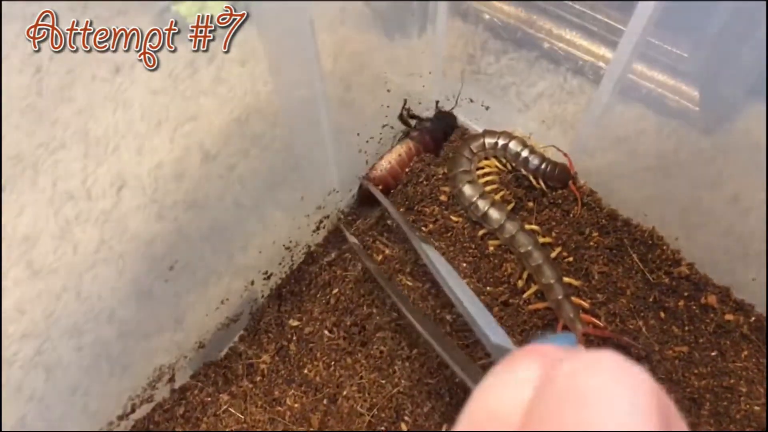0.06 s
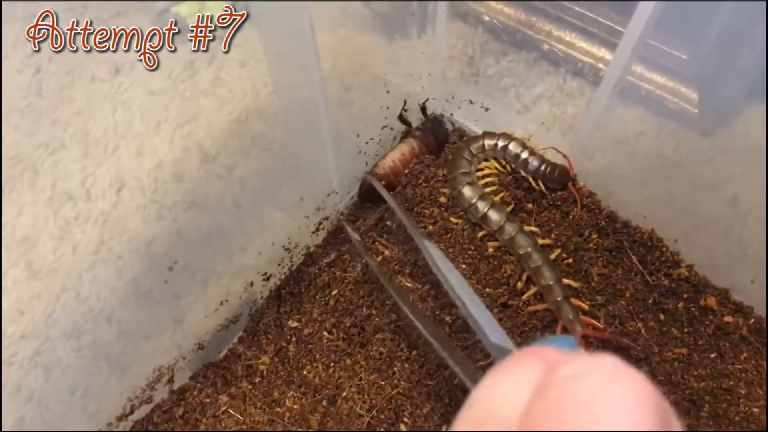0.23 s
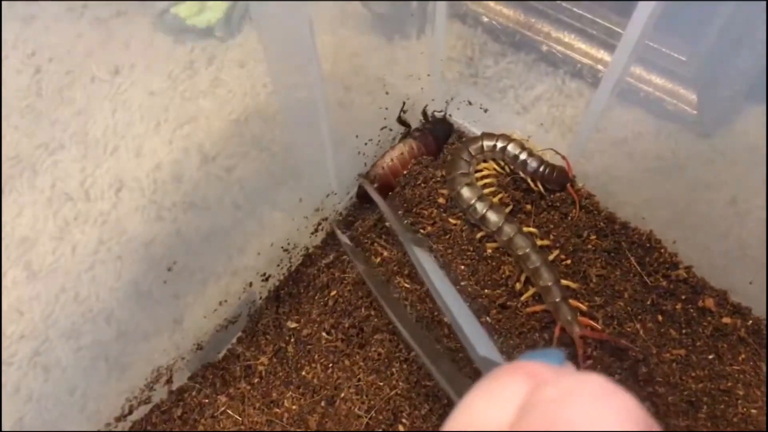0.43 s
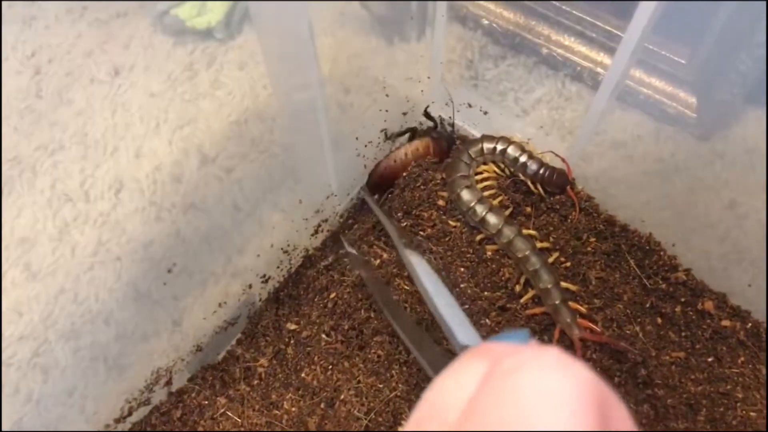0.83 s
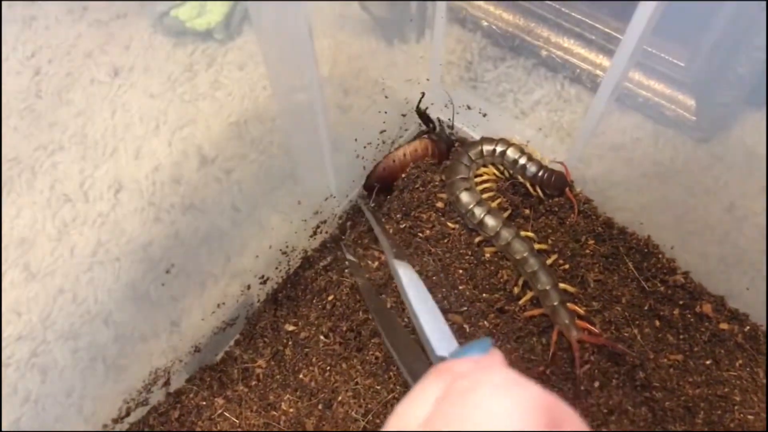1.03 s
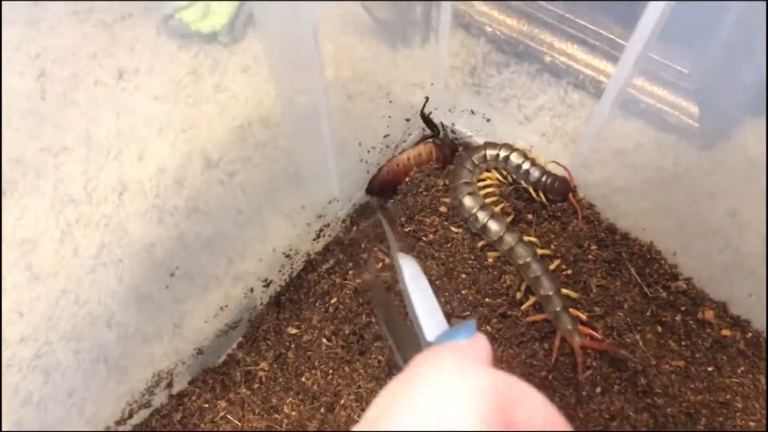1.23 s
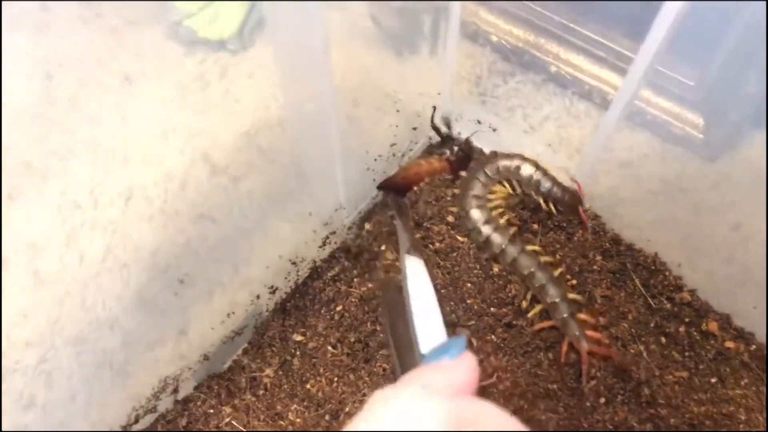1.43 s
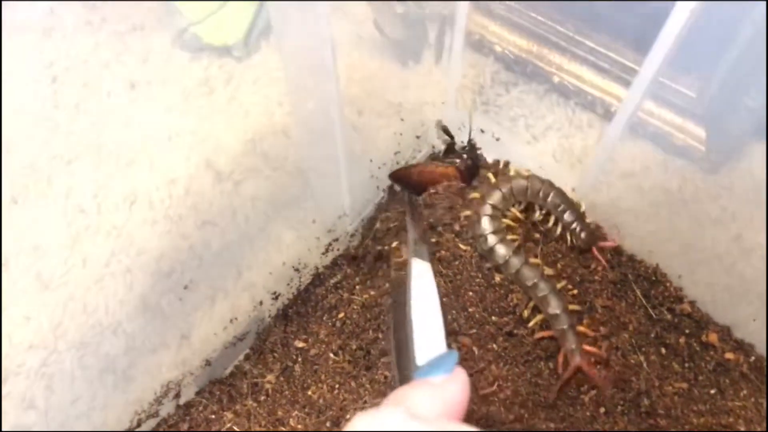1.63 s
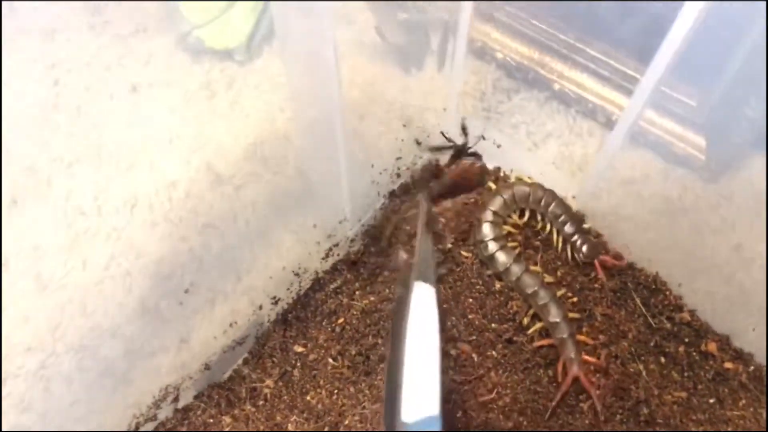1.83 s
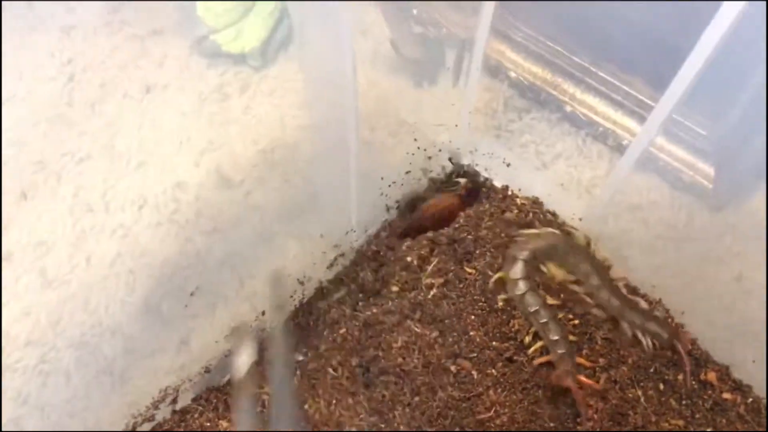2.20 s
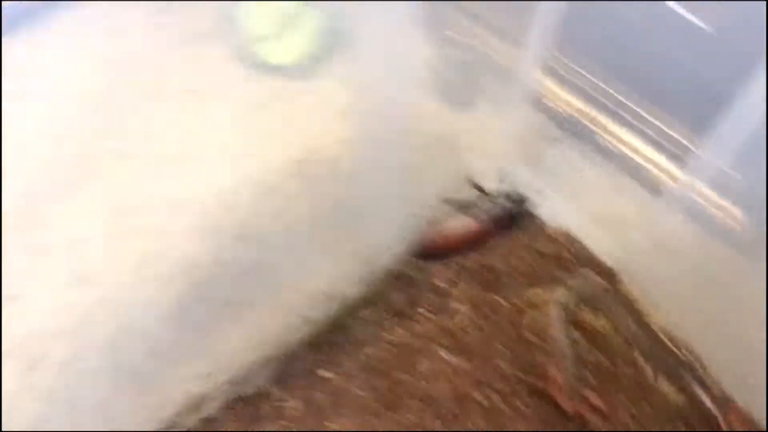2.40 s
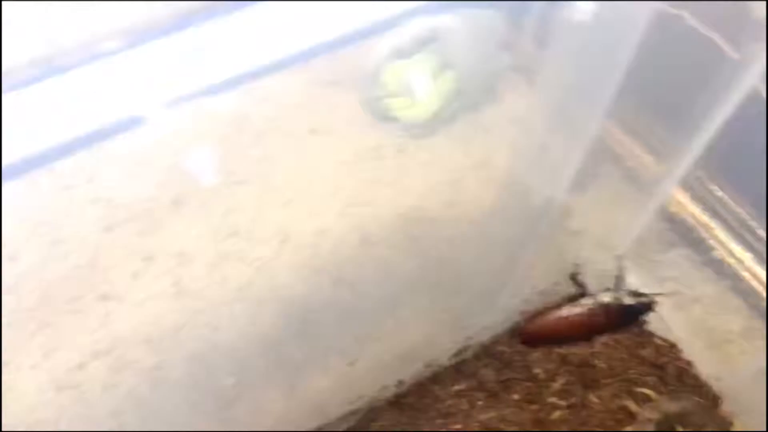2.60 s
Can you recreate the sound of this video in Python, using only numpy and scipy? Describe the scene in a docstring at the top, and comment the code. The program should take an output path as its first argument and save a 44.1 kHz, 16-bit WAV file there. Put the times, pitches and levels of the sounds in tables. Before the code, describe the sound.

A cockroach hisses twice as tweezers lightly bump its plastic tub.

```python
"""A hissing cockroach in a tub

A cockroach in a plastic tub of soil is prodded with steel tweezers and hisses twice.
Each hiss is a rough jet of air from its breathing holes, coloured by resonances (pitches
that stand out); the second changes as the insect is pushed about. The tweezers bump the tub
and scrape the soil, legs and crumbs tick, and the room hums low underneath."""
import sys
import numpy as np
from scipy import signal
from scipy.fft import rfft, irfft, next_fast_len
from scipy.io import wavfile
from scipy.ndimage import map_coordinates

SR = 44100
rng = np.random.default_rng(int(sys.argv[2]) if len(sys.argv) > 2 else 0)


def transcribe(signal):
    """Save signal, clipped to [-1, 1], as a 16-bit WAV file at the path in sys.argv[1]."""
    frames = np.atleast_2d(signal).T
    limited = np.clip(frames, -1, 1)
    pcm = np.round(limited * 32767).astype(np.int16)
    wavfile.write(sys.argv[1], SR, pcm)


N = 121275
TIME = np.arange(N) / SR
LOW_CUT_HZ, TOP_HZ = 41, 15780
MAIN_BAND_HZ = (5200, 10500)  # the strongest part of a hiss


def amp(db):
    """Turn decibels into a multiplier."""
    return 10 ** (np.asarray(db) / 20)


def unit(x):
    """Scale a sound to an average power of 1."""
    return x / np.sqrt(np.mean(x ** 2) + 1e-20)


def curve(points):
    """Join (time_s, value) points with straight lines."""
    return np.interp(TIME, *np.transpose(points))


def wobble(rate_hz):
    """A smooth random curve through rate_hz points a second."""
    return map_coordinates(rng.standard_normal(N), [TIME * rate_hz], mode="wrap")


def filtered(x, response):
    """Scale each frequency in x by response(hz)."""
    size = next_fast_len(N + 8192)
    return irfft(rfft(x, size) * response(np.fft.rfftfreq(size, 1 / SR)), size)[:N]


def noise(colour):
    """Noise shaped by (pitch_hz, relative_db) points."""
    pitch_hz, db = np.transpose(colour)
    white = rng.standard_normal(N)
    return unit(filtered(white, lambda hz: amp(np.interp(np.log(hz + 1), np.log(pitch_hz), db))))


# Colour of the room's rumble: pitch_hz, relative_db
RUMBLE_COLOUR = [(18, -42), (30, -12.5), (80, -5.5), (120, 0.5), (148, -13), (275, -12.5), (400, -29),
                 (720, -31), (2070, -40.5), (15500, -43.5)]
def room(rumble_db=-61.5, hum_hz=120.1, hum_db=-64.5):
    """A low rumble and the wavering hum of mains power."""
    hum = np.sqrt(2) * np.sin(2 * np.pi * hum_hz * TIME + 0.8 * wobble(13))
    hum *= amp(4 * wobble(13))
    return amp(rumble_db) * noise(RUMBLE_COLOUR) + amp(hum_db) * hum


# Loudness of the rustle: time_s, level_db
RUSTLE_LEVEL = [(0, -68.5), (.08, -71.5), (1.0, -72), (1.4, -74), (1.52, -67), (2.55, -71)]
# Its colour: pitch_hz, relative_db
RUSTLE_COLOUR = [(200, -6), (700, 3.5), (2200, -6), (15000, -20)]
def rustle():
    """Handling makes a faint, uneven noise."""
    return amp(curve(RUSTLE_LEVEL)) * unit(noise(RUSTLE_COLOUR) * amp(2.5 * wobble(70)))


# Tiny ticks: start_s, level_db
TICKS = [(0.208, -50), (1.035, -62), (1.1005, -49.5), (2.577, -57.5), (2.64, -63)]
# Their colour: pitch_hz, relative_db
TICK_COLOUR = [(400, -5), (3500, -5), (15000, -20)]
def ticks(fade_s=0.013):
    """Legs and crumbs make bursts of noise that fall 60 dB in fade_s."""
    bursts = sum(amp(db - 60 * np.abs(TIME - start) / fade_s) * (TIME >= start) for start, db in TICKS)
    return bursts * noise(TICK_COLOUR)


# Dips in the colour of both hisses: pitch_hz, half_width_hz, gain_db
HOLLOWS = [(4910, 170, -6), (6600, 190, -2), (9050, 89, -2), (10520, 230, -4.5)]
def jet(resonances, low_hz=0, high_hz=TOP_HZ):
    """Rushing air: noise shaped by steep peaks and dips, kept within one band."""
    def response(hz):
        power = sum(amp(db) ** 2 / (1 + ((hz ** 2 - pitch ** 2) / (width * hz + 1)) ** 2) ** 2
                    for pitch, width, db in resonances)
        dip_db = sum(db * np.exp(-((hz - pitch) / width) ** 2) for pitch, width, db in HOLLOWS)
        return np.sqrt(power) * amp(dip_db) * (hz >= low_hz) * (hz < high_hz)
    return unit(filtered(rng.standard_normal(N), response))


# The two hisses: start_s, end_s, opening_s, closing_s
HISS_TIMES = [(.222, .989, 0.0027, 0.011), (1.636, 2.491, 0.026, 0.015)]
def breathing_hole(which):
    """The valve opens, holds and shuts while the air flutters and sputters."""
    start, end, opening_s, closing_s = HISS_TIMES[which]
    opening = np.clip((TIME - start) / opening_s, 0, 1) * np.clip((end - TIME) / closing_s, 0, 1)
    flutter_db = 0.5 * wobble(74.4)
    sputter_db = 1.43 * wobble(394.5)
    return opening * amp(flutter_db + sputter_db)


# Loudness above the main band: time_s, level_db
TREBLE_LEVEL = [(.25, -51), (.38, -51.5), (.44, -49), (.96, -45.5), (1.67, -57.5), (1.97, -53), (2.19, -58),
                (2.25, -49), (2.42, -41.5), (2.48, -49)]
# Loudness below it: time_s, level_db
RUSH_LEVEL = [(.25, -54), (.97, -51.5), (1.68, -54.5), (2.2, -59.5), (2.39, -51.5), (2.48, -51.5)]
def hiss_edges(resonances):
    """The jet's thin treble and low rush, on either side of its main band."""
    treble = amp(curve(TREBLE_LEVEL)) * jet(resonances, low_hz=MAIN_BAND_HZ[1])
    rush = amp(curve(RUSH_LEVEL)) * jet(resonances, high_hz=MAIN_BAND_HZ[0])
    return treble + rush


# Resonances of the first hiss: pitch_hz, width_hz, relative_db
FIRST_PEAKS = [(1200, 1630, -23.5), (2960, 880, -21.5), (3520, 890, -13), (4530, 650, -13),
               (6000, 1400, -14), (7290, 450, -1.5), (7804, 510, 2.5), (8600, 410, 0), (9170, 530, -1),
               (9890, 720, -9.5), (11270, 1600, -14.5), (12750, 2100, -16.5), (13600, 610, -15),
               (15500, 770, -14)]
# How hard the insect blows, in the main band: time_s, level_db
FIRST_EFFORT = [(.229, -48.5), (.252, -36.5), (.32, -38), (.365, -43.5), (.46, -38.5), (.53, -40.5),
                (.97, -40.5)]
def first_hiss():
    """At the first touch the insect blows out air, strongest near 8 kHz."""
    main = amp(curve(FIRST_EFFORT)) * jet(FIRST_PEAKS, *MAIN_BAND_HZ)
    return breathing_hole(0) * (main + hiss_edges(FIRST_PEAKS))


# Resonances as the second hiss starts, is pressed and is freed: pitch_hz, width_hz, relative_db
SECOND_PEAKS = [(970, 1030, -15), (1720, 1560, -10), (2450, 820, -13.5), (3500, 850, -11),
                (4470, 630, -12.5), (5440, 300, -8.5), (6200, 470, -3.5), (6880, 650, 0.5),
                (7760, 440, -0.5), (8320, 560, 2), (9850, 1400, -8), (11840, 790, -9), (12870, 930, -8.5),
                (14700, 2200, -14)]
PRESSED_PEAKS = [(1410, 1300, -17), (4530, 1240, -8), (6020, 180, -15), (9220, 730, 0), (9470, 1150, -3),
                 (10740, 400, -7)]
FREED_PEAKS = [(6030, 470, -2), (6910, 720, 1.5), (8070, 750, 5.5), (9800, 1100, -2.5)]
# How much of the pressed colour is heard: time_s, share_0_to_1
PRESSED_SHARE = [(1.92, 0), (2.0, 0.28), (2.11, 0.53), (2.22, 0.08)]
# How hard the insect blows, in the main band: time_s, level_db
SECOND_EFFORT = [(1.65, -48), (1.76, -46.5), (1.88, -48.5), (2.1, -41), (2.2, -47.5), (2.26, -41.5),
                 (2.46, -40)]
def second_hiss(freed_at_s=2.035, freeing_s=0.15):
    """The hiss changes colour as the insect is pressed against the wall and slips free."""
    freed = np.clip((TIME - freed_at_s) / freeing_s, 0, 1)
    main = jet(SECOND_PEAKS, *MAIN_BAND_HZ)
    for share, peaks in ((freed, FREED_PEAKS), (curve(PRESSED_SHARE), PRESSED_PEAKS)):
        main = np.sqrt(1 - share) * main + np.sqrt(share) * jet(peaks)
    main *= amp(curve(SECOND_EFFORT))
    return breathing_hole(1) * (main + hiss_edges(SECOND_PEAKS))


def wall_reflections(sound, gain_db=-19, drift=0.004):
    """Five weak bounces off the tub's walls, drifting as the hand moves."""
    delays_s = [delay * (1 + drift * wobble(1.95)) for delay in rng.uniform(0.002, 0.008, size=5)]
    return amp(gain_db) * sum(map_coordinates(sound, [SR * (TIME - delay)]) for delay in delays_s)


def ring(start_s, tones, attack_s):
    """A struck object's tones fall 60 dB in fade_s; each blow is a little different."""
    age = np.maximum(TIME - start_s, 0)
    sound = np.zeros(N)
    for k, (hz, db, fade_s) in enumerate(tones):
        db += rng.normal(0, 0.71)
        hz *= rng.normal(1, 0.026)
        sound += (-1) ** k * amp(db - 60 * age / fade_s) * np.sin(2 * np.pi * hz * age)
    return (1 - np.exp(-age / attack_s)) * sound


# Bumps on the tub: start_s, floor_db, wall_db, cutoff_hz
BUMPS = [(0.785, -49, -55, 700), (.930, -71, -44.5, 1010), (0.9369, -38.5, -51, 500),
         (1.088, -75, -59, 3000), (1.094, -68, -46.5, 3000), (1.1007, -60, -45, 3000),
         (1.1058, -46, -44, 1220), (1.146, -44.5, -50.5, 590), (2.098, -50, -43, 636),
         (2.111, -64, -47, 400)]
# Tones of the soil-laden floor and of the walls: pitch_hz, relative_db, fade_s
FLOOR_TONES = [(188, 7, 0.047), (286, -7.5, 0.063)]
WALL_TONES = [(283, -3.5, 0.056), (510, -3.5, 0.053), (690, -3.5, 0.055), (827, -2.5, 0.05),
              (1085, 0.5, 0.037), (1530, -7, 0.026), (2250, -2, 0.028)]
def tub_bumps():
    """Tweezers make the floor thud and the walls knock; a soft touch weakens the high wall tones."""
    sound = np.zeros(N)
    for start_s, floor_db, wall_db, cutoff_hz in BUMPS:
        softened = [(hz, db - 10 * np.log10(1 + (hz / cutoff_hz) ** 4), fade_s)
                    for hz, db, fade_s in WALL_TONES]
        sound += amp(floor_db) * ring(start_s, FLOOR_TONES, attack_s=0.0041)
        sound += amp(wall_db) * ring(start_s, softened, attack_s=0.002)
    return sound


# Tones that linger: start_s, pitch_hz, level_db, fade_s
LONG_RINGS = [(.9365, 130, -42, .05), (1.116, 193, -46, .38), (1.147, 193, -47.5, .2),
              (1.2, 2215, -68, .16), (2.108, 88, -44.5, .1), (2.108, 285, -50, .14),
              (2.131, 97, -44.5, .08)]
def long_rings():
    """The firmly bumped tub, the steel tweezers and the shoved table ring on."""
    return sum(ring(start_s, [tone], attack_s=0.0032) for start_s, *tone in LONG_RINGS)


# Strokes through the soil: start_s, length_s, level_db
SCRAPES = [(1.084, 0.032, -57), (2.546, 0.044, -62.5)]
# Their colour: pitch_hz, relative_db
SCRAPE_COLOUR = [(300, -9), (1000, 4), (6000, -8.5), (8500, -2), (15000, -7.5)]
def scrapes():
    """Tweezers drag through soil in short swells of gritty noise."""
    strokes = sum(amp(db) * np.sin(np.pi * np.clip((TIME - start) / length, 0, 1))
                  for start, length, db in SCRAPES)
    grit = unit(noise(SCRAPE_COLOUR) * amp(2.5 * wobble(700)))
    return strokes * grit


def echo(sound, fade_s=0.12, gain_db=-20):
    """A weak, short echo smears each sound into a fading tail."""
    age = TIME[:SR // 3]
    tail = rng.standard_normal(len(age)) * amp(-60 * age / fade_s)
    return amp(gain_db) * signal.fftconvolve(sound, tail / np.linalg.norm(tail))[:N]


def scene():
    """The sounds in the tub, their echo and the room, in one channel."""
    hisses = first_hiss() + second_hiss()
    near = rustle() + ticks() + hisses + wall_reflections(hisses) + tub_bumps() + long_rings() + scrapes()
    return (near + echo(near) + room())[None]


def record(dry):
    """Cut the deepest bass and the very highest treble."""
    def response(hz):
        return (hz < TOP_HZ) * hz ** 3 / np.sqrt(hz ** 6 + LOW_CUT_HZ ** 6)
    return filtered(dry[0], response)[None]


dry = scene()
out = record(dry)
transcribe(out)
```